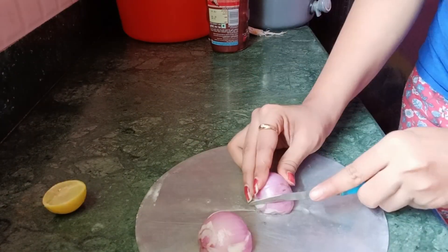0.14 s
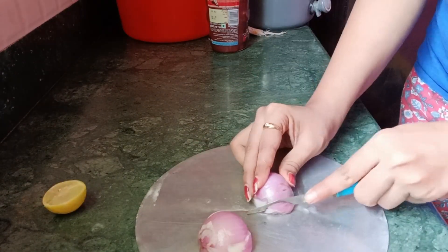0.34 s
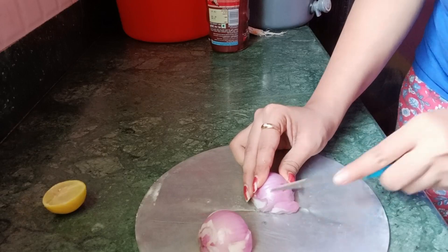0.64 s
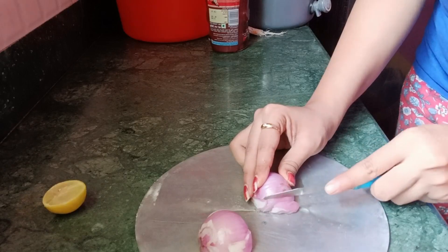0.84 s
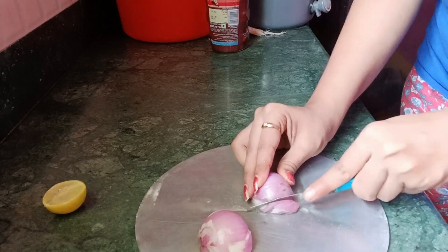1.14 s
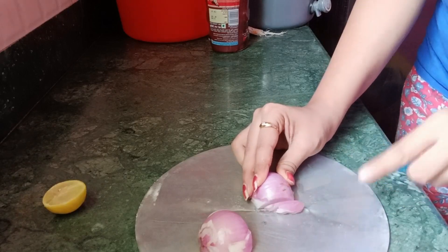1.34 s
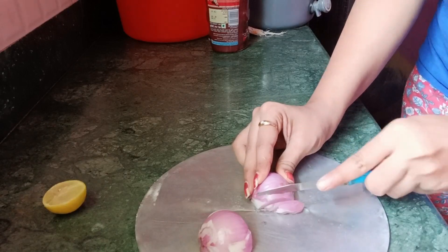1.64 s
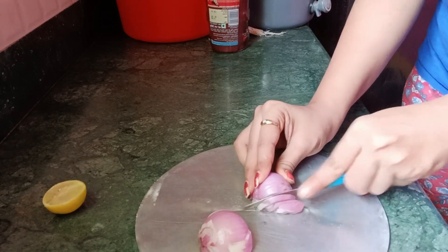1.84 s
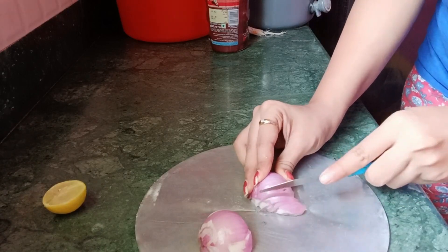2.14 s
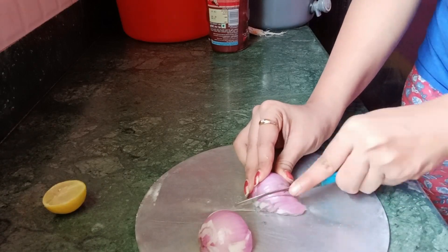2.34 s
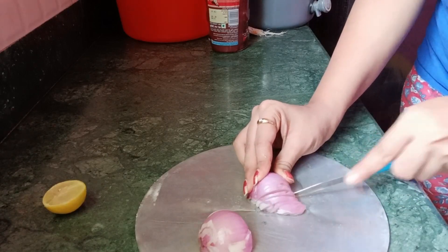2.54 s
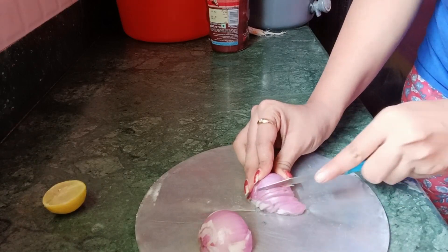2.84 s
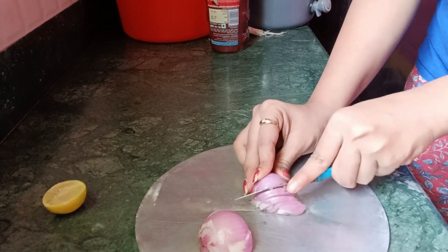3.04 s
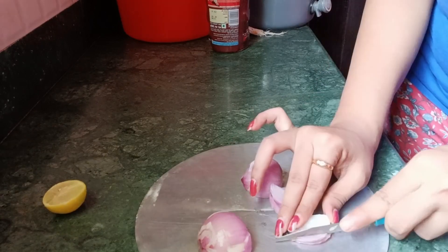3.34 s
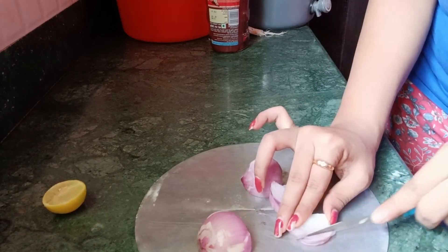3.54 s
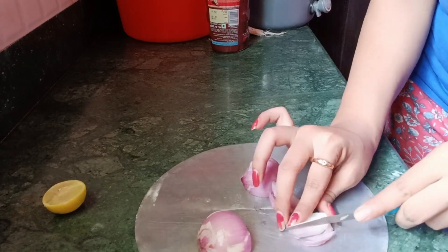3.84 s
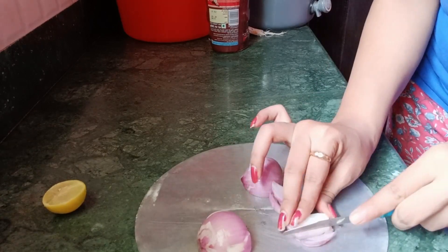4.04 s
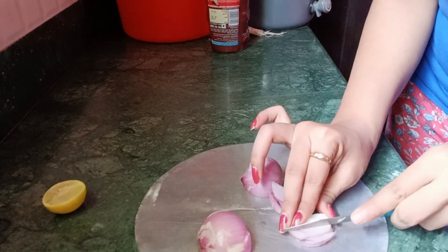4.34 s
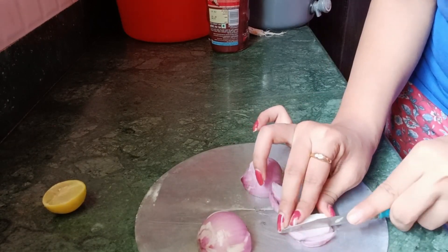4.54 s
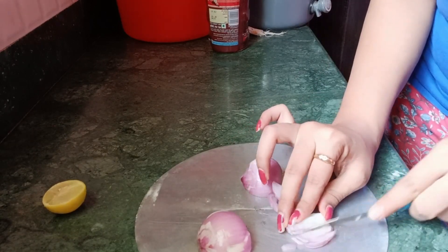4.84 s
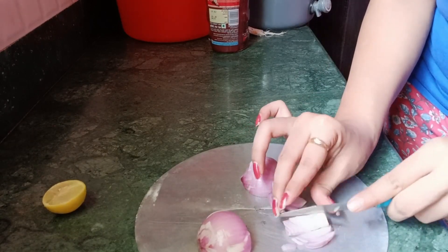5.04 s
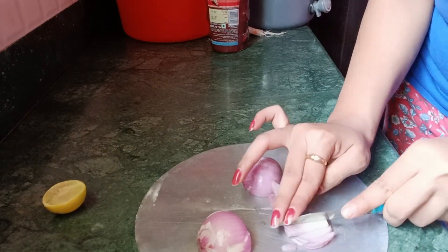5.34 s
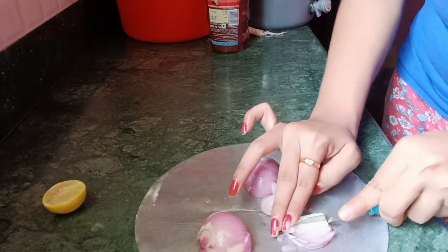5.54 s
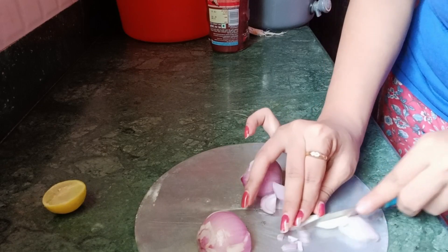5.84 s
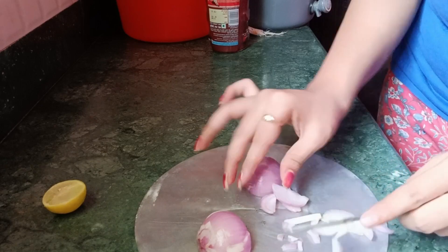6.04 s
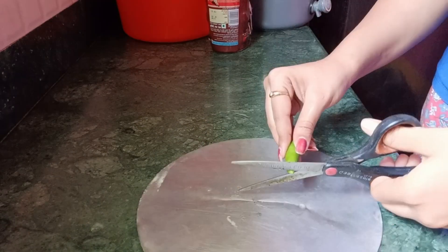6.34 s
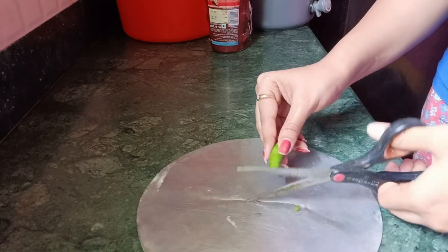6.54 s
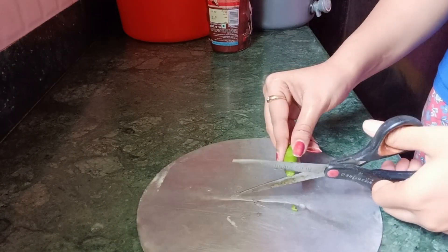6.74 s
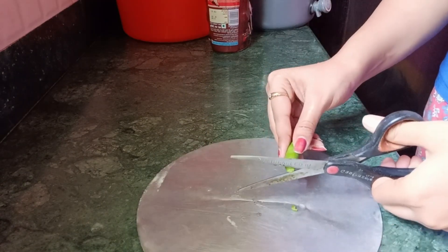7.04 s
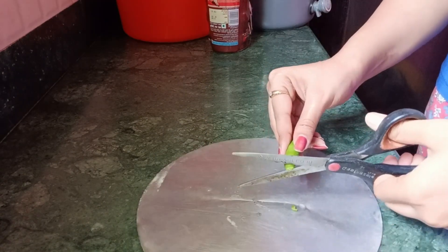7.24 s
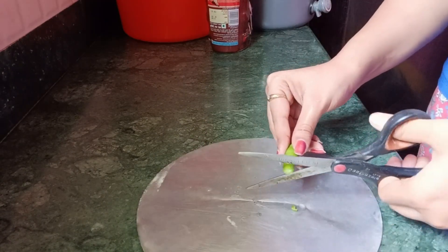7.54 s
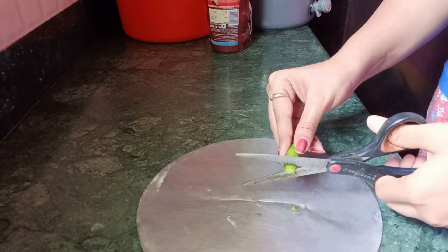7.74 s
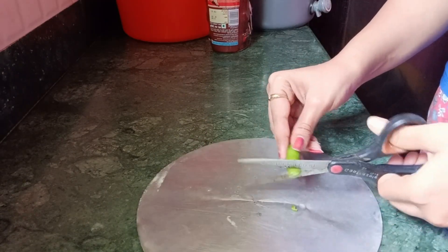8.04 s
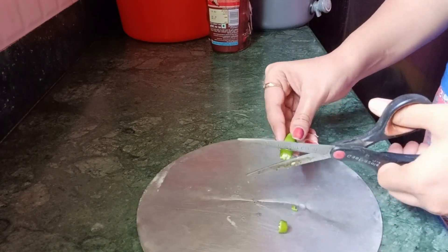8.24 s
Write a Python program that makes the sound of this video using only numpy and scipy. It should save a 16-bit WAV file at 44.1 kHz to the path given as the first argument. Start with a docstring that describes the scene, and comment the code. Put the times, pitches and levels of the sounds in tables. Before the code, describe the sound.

A close stereo microphone hears a kitchen counter, with low unsteady room rumble and a thin, very high whine, strongest in the first second and nearly gone after 3.7. A light contact leads to a loud knife knock on a thin metal plate at 0.4, with a short midrange ring. Soft, wet, gritty onion strokes follow from 1 to 3.3, with a moderate knock at 1.9 and lighter double taps near 2.6. A sharp clank lands at 3.4, then a faint low plate hum and sparse quiet cutting. Strong ringing blows come at 4.7 and 5.6, with small crunches around them and a faint rubbed squeak near 5.9 to 6.1. Scissors then hiss finely shut, with a clear tick and plate knock at 6.7, a softer gritty snip around 7.5, and another with light taps and a low hum at 8 to 8.3.

```python
"""An onion is sliced on a thin metal plate that lies on a stone kitchen counter, then scissors snip a chilli.
From the start a low room rumble, filtered noise with wavering modes, lies under a high whine that soon fades.
Knife blows set the plate ringing as a sum of decaying modes; strokes between them crunch as bursts of
fractures. Later the rubbed plate hums and squeaks by friction, as a gliding tone with narrow-band noise. Last
the scissors hiss shut as a bright grain and tick as they catch, while chilli pieces fall and knock the plate
lightly."""
import sys
import numpy as np
from scipy import signal
from scipy.fft import rfft, irfft, next_fast_len
from scipy.io import wavfile
from scipy.ndimage import uniform_filter1d

SR = 44100
rng = np.random.default_rng(int(sys.argv[2]) if len(sys.argv) > 2 else 0)


def store_wav(level_fs):
    """Save 16-bit WAV to argv[1]."""
    pcm = np.round(np.clip(np.atleast_2d(level_fs), -1, 1) * 32767)
    wavfile.write(sys.argv[1], SR, pcm.T.astype(np.int16))


N = 369985
TIME = np.arange(N) / SR

# relative spectrum of the crunch, also of the noise that leads into a blow: f/Hz, level/dB
CRUNCH_SPECTRUM = [(80, -2.5), (300, 5), (600, 1), (1100, 1), (3000, 1.5), (4500, -1), (6500, -0.5),
                   (9000, -4), (12500, -5), (16000, -1.5)]


def from_db(db):
    """Level definition: an amplitude ratio is 10 to the power of dB/20."""
    return 10 ** (np.asarray(db) / 20)


def rms_one(x):
    """Power normalisation: scale to rms 1 over all channels."""
    return x / np.sqrt(np.mean(x ** 2) + 1e-20)


def energy_one(x):
    """Energy normalisation: scale to the energy of 5 ms at rms 1, averaged over the channels."""
    return rms_one(x) * np.sqrt(.005 * SR / x.shape[-1])


def at_hz(points, hz):
    """Logarithmic pitch scale: interpolate a spectrum linearly over log frequency."""
    f, value = np.transpose(points)
    return np.interp(np.log(hz + 1e-3), np.log(f), value)


def coloured(x, points):
    """Minimum-phase filtering: folding the cepstrum gives a causal response with the given spectrum."""
    size = 4096
    level_db = at_hz(points, np.fft.rfftfreq(size, 1 / SR))
    cepstrum = irfft(np.log(from_db(level_db)))
    cepstrum[1:size // 2] *= 2
    cepstrum[size // 2 + 1:] = 0
    response = irfft(np.exp(rfft(cepstrum)))[:size // 2]
    return signal.oaconvolve(x, response[None], axes=-1)[:, :x.shape[-1]]


def resonance(x, hz, width_hz):
    """Damped oscillator: a two-pole resonance with a gain of about 1 at its peak."""
    r = np.exp(-np.pi * width_hz / SR)
    zeros = np.array([1, 0, -1]) * (1 - r * r) / 2
    poles = [1, -2 * r * np.cos(2 * np.pi * hz / SR), r * r]
    return signal.lfilter(zeros, poles, x)


def diffuse(size):
    """Diffuse-field coherence: white stereo noise whose left-right likeness depends on frequency."""
    # likeness of the two channels in sound that fills the room: f/Hz, correlation (0 to 1)
    likeness = [(30, .2), (70, .75), (130, 1), (300, 0.93), (640, 0.14), (1400, 0.35), (3000, 0.026),
                (7000, .1), (16000, .05)]
    mid, side = rfft(rng.standard_normal((2, next_fast_len(size, True))))
    alike = np.clip(at_hz(likeness, np.linspace(0, SR / 2, len(mid))), 0, 1)
    common = np.sqrt((1 + alike) / 2) * mid
    opposed = np.sqrt((1 - alike) / 2) * side * [[1], [-1]]
    return irfft(common + opposed)[:, :size]


def dying(t60, size):
    """Exponential reverberation: dense reflections fade by 60 dB in t60 seconds."""
    return diffuse(size) * from_db(-60 * np.arange(size) / SR / t60)


def drift(per_s, size=N):
    """Random fluctuation: straight lines join per_s chance values a second, with a spread of about 1."""
    values = rng.standard_normal(2000)
    return 1.2 * np.interp(TIME[:size] * per_s, np.arange(len(values)), values)


def swell(rise_s, fall_s, depth_db, arch, reach=1.7):
    """Stroke envelope: the level falls off around a peak as a power of time; also the seconds before the peak."""
    t = np.arange(-reach * rise_s, reach * fall_s, 1 / SR)
    return from_db(-depth_db * np.maximum(-t / rise_s, t / fall_s) ** arch), -t[0]


def add(out, s, sound):
    """Superposition: mix a sound in at time s."""
    at = round(s * SR)
    out[:, at:at + sound.shape[-1]] += sound[:, :N - at]


def stretches(rows, fade_s=.2):
    """Stepwise level: each row holds until the next begins, with a short fade in dB between."""
    rows = np.array(rows)
    held = rows[np.searchsorted(rows[1:, 0], TIME), 1:].T
    return from_db(uniform_filter1d(held, int(fade_s * SR)))


def background(line_width_hz=70, hiss_db=-10, hum_db=-77, modes_db=-3, swell_db=4):
    """Room modes in noise: a rumble, a weak mains hum, and a whine of narrow noise lines on a thin hiss."""
    # levels that hold for a stretch: start t/s, rumble level/dB, whine level/dB
    levels = [(0, -56.5, -61), (.45, -58, -57), (.87, -60, -64.5), (3.68, -65, -81.5), (6.2, -67.5, -91)]
    # resonances of the room that swell and fade in the rumble: f/Hz, width/Hz, relative level/dB
    room_modes = [(58, 9.2, -8), (107, 16, -5.5), (155, 47, -1), (192, 20, -9.5), (345, 45, -10),
                  (508, 17, -8.5)]
    # nearly evenly spaced lines of the whine: f/Hz, relative level/dB
    whine_lines = [(8080, -98), (8441, -86.5), (8829, -81), (9189, -73.5), (9561, -73.5), (9938, -72.5),
                   (10298, -81.5), (11036, -98.5), (11396, -99)]
    # relative spectra of the rumble and of the hiss under the whine: f/Hz, level/dB
    rumble_spectrum = [(20, -1), (60, -3.5), (100, -0.5), (160, -1.5), (300, -2), (500, -8.5), (700, -9.5),
                       (1600, -16), (2400, -22), (3500, -32), (7000, -38.5), (16000, -44.5)]
    hiss_spectrum = [(100, -33.5), (6800, -31), (7700, -5), (9500, -1.5), (11500, -3), (12900, -9.5),
                     (13800, -28.5), (16000, -32)]

    rumble_gain, whine_gain = stretches(levels)
    air = diffuse(N)
    modes = 0
    for hz, width_hz, level_db in room_modes:
        mode = rms_one(resonance(resonance(air, hz, width_hz), hz, 4 * width_hz))
        modes = modes + from_db(level_db + swell_db * drift(7)) * mode
    broad = rms_one(coloured(diffuse(N), rumble_spectrum))
    rumble = rms_one(broad + from_db(modes_db) * rms_one(modes))

    source = rng.standard_normal(N)
    lines = 0
    for hz, level_db in whine_lines:
        line = resonance(resonance(source, hz, line_width_hz), hz, 2 * line_width_hz)
        lines = lines + from_db(level_db) * line
    whine = rms_one(lines) + from_db(hiss_db) * rms_one(coloured(air, hiss_spectrum))
    hum = from_db(hum_db) * np.sqrt(2) * np.sin(2 * np.pi * 100 * TIME)
    return rumble_gain * rumble + hum + whine_gain * whine


def shimmer(hz=6250, width_hz=450, level_db=-96, swing_db=6.5):
    """Amplitude-modulated band noise: a very faint strip of treble swells and fades at random."""
    band = resonance(resonance(diffuse(N), hz, width_hz), hz, 2 * width_hz)
    return from_db(level_db + swing_db * np.tanh(drift(5))) * rms_one(band)


def lead_noise(rise_t60):
    """Noise onset: a short noise burst, a decay turned backwards, grows for 9 ms up to each blow."""
    return energy_one(coloured(dying(rise_t60, size=400)[:, ::-1], CRUNCH_SPECTRUM))


def plate_modes(t60, weight_db, size, usual_t60=.45):
    """Modal superposition: each blow wakes the modes with new strengths; a shorter t60 of the blow shortens all."""
    # modes of the plate: f/Hz, relative level/dB, decay t60/s when the blow's own t60 is usual_t60
    mode_table = [(207, -13, 0.38), (568, -17.5, .3), (697, -15, 0.48), (912, -10, 0.39),
                  (1204, -15.5, 0.22), (1375, -5, 0.45), (1540, -1.5, .4), (1571, 1, 0.19),
                  (1960, -1.5, 0.24), (2068, -6.5, 0.37), (2267, -10, 0.66), (2400, -9, 0.13),
                  (3240, -15.5, 0.2), (3580, -17, 0.38), (4280, -15.5, .2)]
    t = np.arange(size) / SR
    hz, level_db, decay = np.transpose(mode_table)[:, :, None]
    hz = hz * (1 + rng.normal(0, 0.005, hz.shape))   # the load on the plate detunes it a little
    common_phase = rng.uniform(0, 2 * np.pi, hz.shape)
    phase = common_phase + rng.normal(0, 0.48, (2, *hz.shape))   # the channels differ a little
    start_db = level_db + weight_db(hz) + rng.normal(0, 1.0, hz.shape)
    strength = from_db(start_db - 60 * t / (decay * t60 / usual_t60))
    return energy_one(np.sum(strength * np.sin(2 * np.pi * hz * t + phase), axis=1))


def blow(hz, crack_db, thud_db, ring_db, t60, width=.4, chatter_db=-2, chatter_t60=0.046,
         crack_t60=0.027, modes_db=-5, late_thud_db=10.0, choke=0.63, narrowing=1.0,
         upper=2.55, upper_db=-20, crack_fade_db=12):
    """Impact excitation: a click and fast-fading edge chatter drive a broad resonance; plate and room ring on."""
    # relative spectra of the sharp crack and of the counter's thud: f/Hz, level/dB
    crack_spectrum = [(60, -16), (300, -8.5), (520, -8), (900, 4), (1500, 3), (2100, 4), (2500, 6.5),
                      (3000, 3.5), (4600, 0.5), (6500, -3), (9000, -2.5), (12000, -3), (16000, -8.5)]
    thud_spectrum = [(25, -9.5), (60, -9), (125, -16), (170, -7.5), (205, 1), (250, -12), (350, -10),
                     (560, -10.5), (680, -11), (890, -4), (1130, -15), (3000, -44.5)]

    size = 15500
    t = np.arange(size) / SR
    click = np.zeros((2, size))
    click[:, 0] = 1
    click = energy_one(click)
    contact = click + from_db(chatter_db) * energy_one(dying(chatter_t60, size))
    wash = dying(t60, size)
    # a soft touch gives a purer note and wakes chiefly the modes near it
    width_hz = width * hz * from_db(narrowing * crack_db)

    def nearness_db(f):
        """Contact selectivity: weaken modes by their distance in octaves, up to a limit."""
        return min(crack_db, 0) * np.minimum(2.6 * np.abs(np.log2(f / hz)), 1)

    def peak(x, f):
        """Cascaded resonance: two oscillators in series at one frequency."""
        return energy_one(resonance(resonance(x, f, width_hz), f, 2.0 * width_hz))

    def body(x):
        """Resonator pair: the main resonance and a weaker, inverted one above it."""
        return peak(x, hz) - from_db(upper_db) * peak(x, upper * hz)

    modes = plate_modes(t60, nearness_db, size)
    crack_source = .5 * click + energy_one(dying(crack_t60, size))
    crack = energy_one(coloured(crack_source, crack_spectrum))
    thud = energy_one(coloured(contact, thud_spectrum))
    attack = body(contact) + from_db(crack_db) * crack + from_db(thud_db) * thud

    ringing = 0.52 * body(wash) + from_db(modes_db) * modes
    bright_wash = energy_one(coloured(wash, crack_spectrum))
    ringing += from_db(crack_db - crack_fade_db * t / t60) * bright_wash   # the bright part dies faster
    late_thud = energy_one(coloured(dying(t60, size), thud_spectrum))
    ringing += from_db(thud_db + late_thud_db) * late_thud
    ending = 1 / (1 + (t / (choke * t60)) ** 10)   # the last of the ring drops away steeply
    return attack + from_db(ring_db) * ringing * ending


def plate(gain_db=-2.0, lead_db=-14):
    """Level-dependent impact: knife blows and falling chilli pieces strike the plate; thud and ring time follow
    from the blow."""
    # blows: t/s, level/dB before gain_db, main resonance f/Hz, crack and ringing level/dB relative to the blow
    blows = [ (0.139, -45.5, 1730, -2, 4.5), (0.307, -41, 1850, -6, -2), (0.3408, -41, 1840, -8.5, 0.5),
             (0.4171, -12.5, 1820, -4.5, -7.5), (1.037, -72, 1990, 12.5, -5),
             (1.146, -54.5, 1890, 5.5, -15), (1.3159, -43, 1740, -10, 3.5), (1.787, -57, 1880, -9, 12.5),
             (1.910, -26.5, 1850, -6.5, -9.5), (2.5566, -33, 1750, -8, -0.5), (2.574, -35, 1580, -12, -13),
             (3.4364, -18.5, 1880, 0.5, -2), (4.714, -15.5, 1620, 1.5, 4.5), (5.59, -14.5, 1587, -1.5, -1),
             (5.781, -47.5, 1690, -7, -2), (5.95, -51, 1260, -13, 13), (6.214, -55.5, 1340, -20.5, -7),
             (6.311, -63.5, 1574, -8.5, 14.5), (6.647, -46.5, 1360, -22.5, -5),
             (6.6747, -26.5, 1310, -3.5, 6), (7.516, -44.5, 1226, -13, -1), (7.9945, -35, 1296, -19.5, 3),
             (8.2354, -46.5, 1336, -16.5, -3.5), ]
    # the thud grows with the crack and with the ringing: dB, dB per dB, dB per dB
    base_thud_db, thud_per_crack, thud_per_ring = -19, 0.59, 0.37
    # a harder blow rings longer: t60 of the lightest touch, and an extra that grows with the level
    touch_t60_s, hard_extra_t60_s, hard_blow_db, t60_growth = .19, .23, -15, 0.46

    out = np.zeros((2, N))
    for s, level_db, hz, crack_db, ring_db in blows:
        thud_db = base_thud_db + thud_per_crack * crack_db + thud_per_ring * ring_db
        t60 = touch_t60_s + hard_extra_t60_s * from_db(t60_growth * (level_db - hard_blow_db))
        lead = from_db(level_db + crack_db + lead_db) * lead_noise(rise_t60=0.0098)
        add(out, s - lead.shape[-1] / SR, lead)
        add(out, s, from_db(level_db + gain_db) * blow(hz, crack_db, thud_db, ring_db, t60))
    return out


def crackle(per_s, spread_db, room_db, room_t60, size=SR):
    """Random point process: tiny fractures of uneven size at chance moments, with their reflections."""
    sizes = from_db(spread_db * np.minimum(rng.exponential(1, size), 4))
    sizes = sizes * rng.choice([-1, 1], size)
    clicks = sizes * (rng.random(size) < per_s / SR)
    room = dying(room_t60, size=SR // 4)
    room *= from_db(room_db) / np.sqrt(np.sum(room ** 2) / 2)
    return rms_one(clicks + signal.oaconvolve(clicks[None], room, axes=-1)[:, :size])


def slicing(blade_db=-5.0, crunch_db=6.5, shift_db=3.5, grit_db=1.3, tear_db=-6,
            blade_tear_db=-1, grip_spread=0.037):
    """Fracture noise: cells burst and layers tear with small snaps, a wet crunch that also shakes the blade."""
    # to-and-fro strokes: deepest bite t/s, rise t/s, fall t/s, level/dB,
    # blade level/dB; blade_db and crunch_db then shift the two parts
    strokes = [ (0.309, 0.027, .07, -51, -6.5), (0.575, 0.13, .10, -54.5, 6), (0.716, 0.085, 0.06, -71, 10),
               (1.185, 0.083, 0.11, -51, 5.5), (1.359, .07, 0.11, -55.5, 1.5),
               (1.456, 0.055, 0.057, -67.5, 14), (1.89, 0.13, 0.13, -49.5, 10.5),
               (2.02, 0.05, 0.13, -50.5, 6.5), (2.45, 0.093, 0.13, -49, 9.5),
               (2.575, 0.055, 0.099, -47, -3), (3.055, 0.11, 0.11, -46.5, 3.5),
               (3.28, 0.063, 0.16, -50.5, 5.5), (3.62, 0.15, .15, -55, 7.5), (4.19, .08, 0.12, -75.5, -10),
               (4.624, 0.19, 0.34, -71.5, 0), (4.91, 0.11, 0.13, -53.5, 6.5), (5.52, 0.13, .08, -77.5, 7.5),
               (5.775, 0.059, 0.05, -56.5, 1), (5.99, 0.092, 0.1, -59.5, 6), (6.34, 0.1, 0.096, -76, 9.5), ]
    # resonances of the blade in the onion: f/Hz, width/Hz, relative level/dB
    blade_modes = [(1646, 260, 1.5), (1950, 200, 0.5), (2300, 500, -0.5)]

    out = np.zeros((2, N))
    for s, rise_s, fall_s, level_db, resonance_db in strokes:
        cells = crackle(per_s=3500, spread_db=3.0, room_db=5.0, room_t60=0.062)
        cells = cells * from_db(grit_db * drift(130, size=SR))
        tears = crackle(per_s=130, spread_db=2.5, room_db=1.5, room_t60=0.06)
        # the onion grips the blade at changing places: resonances shift from stroke to stroke and take turns
        grip = 1 + grip_spread * rng.standard_normal()
        drive = cells + from_db(blade_tear_db) * tears
        blade = 0
        for hz, width_hz, mode_db in blade_modes:
            mode = resonance(resonance(drive, grip * hz, width_hz), grip * hz, 3 * width_hz)
            blade = blade + from_db(mode_db + shift_db * drift(21, size=SR)) * mode
        crunch = coloured(cells + from_db(tear_db) * tears, CRUNCH_SPECTRUM)
        cut = from_db(blade_db + resonance_db) * rms_one(blade) + from_db(crunch_db) * rms_one(crunch)
        gain, lead_s = swell(rise_s, fall_s, depth_db=28.5, arch=1.5)
        add(out, s - lead_s, from_db(level_db) * gain[:SR] * cut[:, :len(gain)])
    return out


def rubbing(width_hz=90, glide=0.0145, flutter_db=2.5, friction_db=0):
    """Friction-driven vibration: the plate hums unevenly for a moment; the note sags as the pressure eases."""
    # hums and squeaks: start t/s, end t/s, middle f/Hz, level/dB
    rubs = [(3.524, 3.782, 448, -54.5), (3.694, 4.05, 3800, -83), (5.331, 5.53, 1410, -65.5),
            (5.876, 6.11, 1294, -52.5), (6.312, 6.394, 1181, -59), (7.721, 7.791, 554, -65),
            (8.131, 8.374, 390, -56)]
    out = np.zeros((2, N))
    for start, end, hz, level_db in rubs:
        size = max(int((end - start) * SR), 64)
        along = np.linspace(0, 1, size)
        sagging_hz = hz * (1 + glide * (.5 - along))
        tone = np.sin(2 * np.pi * np.cumsum(sagging_hz) / SR)
        friction = rms_one(resonance(resonance(diffuse(size), hz, width_hz), hz, 10 * width_hz))
        hum = rms_one(tone + from_db(friction_db) * friction)
        uneven = from_db(level_db + flutter_db * drift(69.0)[:size])
        add(out, start, uneven * hum * np.hanning(size))
    return out


def scissors(slide_db=2.0, catch_db=2.5, catch_t60=0.048):
    """Sliding contact: steel on steel gives a fine bright grain, and now and then catches with a tick."""
    # blades sliding shut: tightest grip t/s, rise t/s, fall t/s, level/dB before slide_db
    snips = [(6.575, 0.098, 0.065, -54.5), (7.492, 0.059, .07, -50), (7.92, 0.1, 0.13, -62),
             (8.132, .02, 0.13, -55.5), (8.2, 0.058, 0.085, -46.5)]
    # edges catching or snapping shut: t/s, level/dB before catch_db
    catches = [(6.6755, -31), (7.4418, -55), (7.462, -49), (7.473, -53.5), (7.489, -49), (8.124, -54.5),
               (8.184, -46.5)]
    # relative spectrum of steel on steel: f/Hz, level/dB
    shear_spectrum = [(200, 10), (1500, -3.5), (3500, -10), (6000, -1.5), (8500, 2), (10500, 2.5),
                      (12500, 0.5), (16000, 1.5)]

    out = np.zeros((2, N))
    for s, rise_s, fall_s, level_db in snips:
        grain = crackle(per_s=3200, spread_db=6.0, room_db=0.0, room_t60=0.32)
        grain = rms_one(coloured(grain, shear_spectrum))
        gain, lead_s = swell(rise_s, fall_s, depth_db=29, arch=1.07)
        add(out, s - lead_s, from_db(level_db + slide_db) * gain[:SR] * grain[:, :len(gain)])
    for s, level_db in catches:
        tick = energy_one(coloured(dying(catch_t60, size=SR // 8), shear_spectrum))
        add(out, s, from_db(level_db + catch_db) * tick)
    return out


def scene():
    """Linear superposition: the sounds on and around the counter add up."""
    return background() + shimmer() + plate() + slicing() + rubbing() + scissors()


def record(dry, top=1.0):
    """Port response and saturation: each microphone port has its notches; peaks are rounded, the top is cut."""
    # responses of the two microphone ports: f/Hz, level/dB
    left_port = [(2800, -0.5), (4400, -1), (5500, -3.5), (6600, -13.5), (7400, -9.5), (8300, 4.5),
                 (10300, 3.5), (11000, -3.5), (12400, 1), (13500, -5.5), (15500, -10)]
    right_port = [(2800, -0.5), (5400, 3), (6200, 0.5), (7900, 6), (8800, 4), (9500, -11), (10300, -22),
                  (11000, -7.5), (12400, -0.5), (13700, -0.5), (15600, 0.5)]
    left, right = coloured(dry[:1], left_port), coloured(dry[1:], right_port)
    # the right channel is delayed by 2 samples to line up with the left
    heard = np.vstack([left, np.roll(right, 2)])
    low_pass = signal.ellip(12, .1, 70, 16100, fs=SR, output="sos")   # cutoff in Hz
    return signal.sosfilt(low_pass, top * np.tanh(heard / top))


dry = scene()
out = record(dry)
store_wav(out)
```